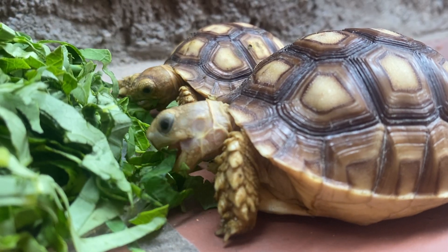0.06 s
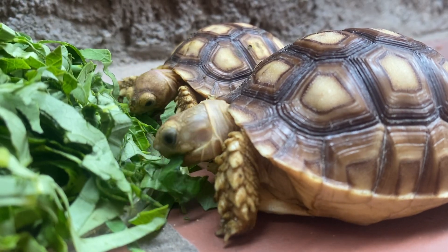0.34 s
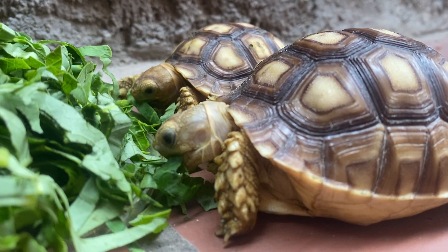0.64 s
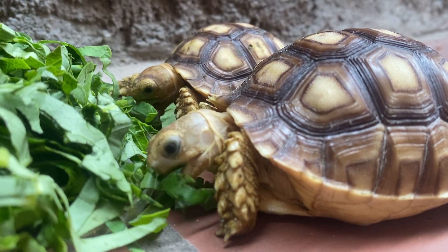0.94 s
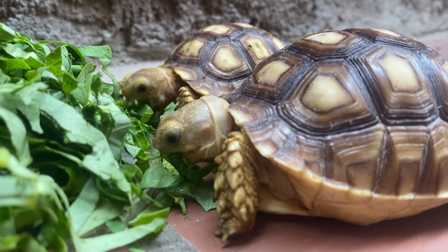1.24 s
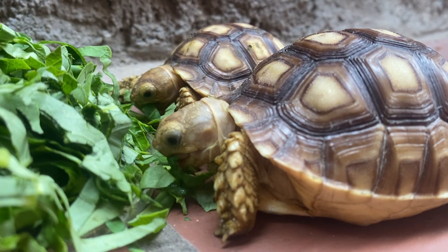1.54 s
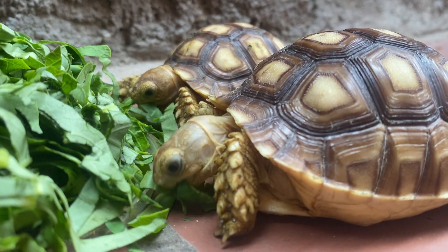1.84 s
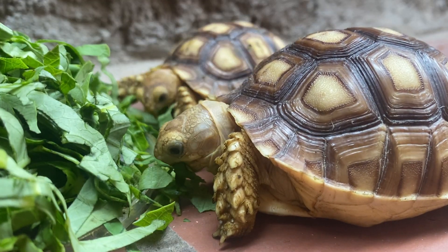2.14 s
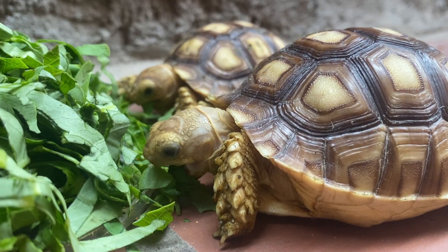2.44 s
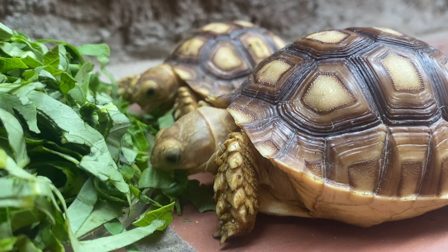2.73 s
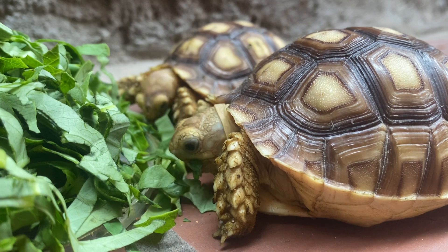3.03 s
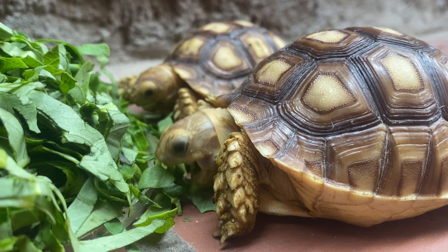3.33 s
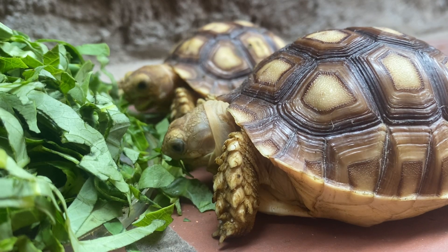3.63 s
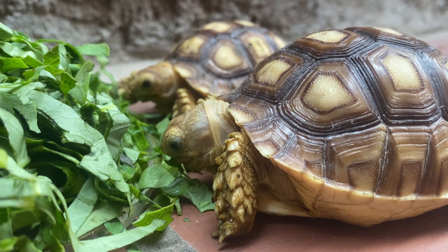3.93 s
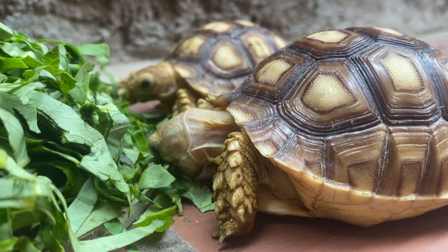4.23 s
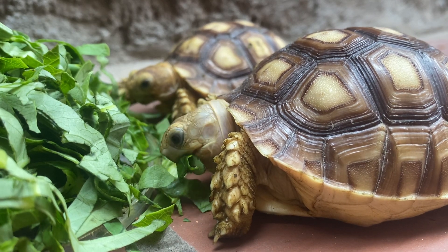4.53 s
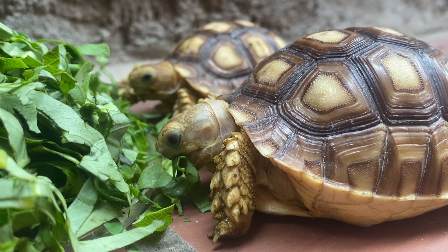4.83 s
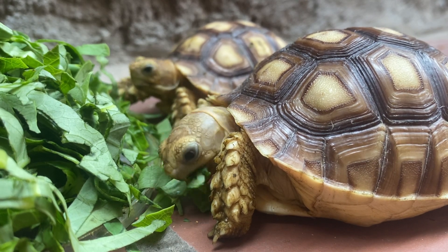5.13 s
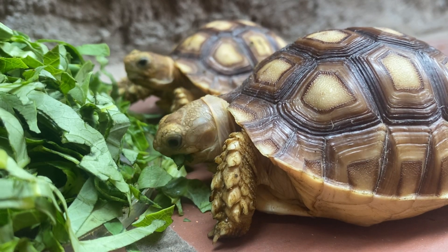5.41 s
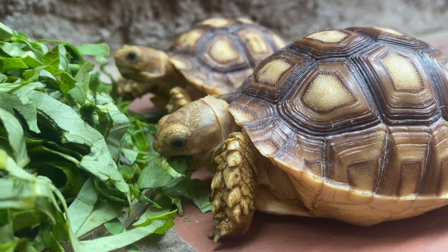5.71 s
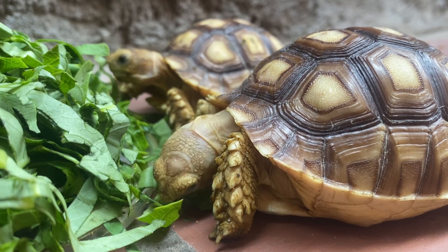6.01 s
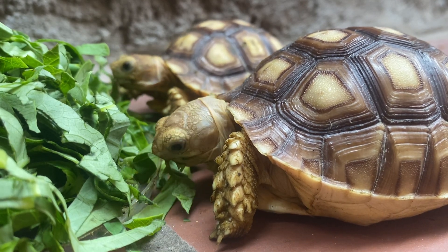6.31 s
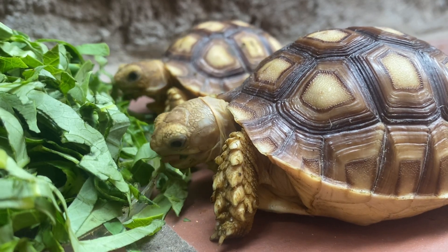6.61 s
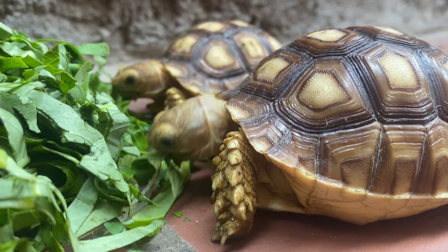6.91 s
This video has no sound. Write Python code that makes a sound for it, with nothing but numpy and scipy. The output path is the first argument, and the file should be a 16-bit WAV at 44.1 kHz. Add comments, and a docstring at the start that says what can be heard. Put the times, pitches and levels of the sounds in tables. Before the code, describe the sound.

Small tortoises bite leafy greens with faint crisp clicks over a steady low room rumble and a faint motor hum.

```python
"""A room, close to two small tortoises feeding on a heap of greens. Leaf ribs snap in their beaks
as runs of bursting cells, leaves rub in faint ticks, and three thin squeaks arch high in the treble.
Once, something knocks softly. Behind them the room rumbles and rushes, a motor's hum beats against
the mains, and a low drone swells."""
import sys
import numpy as np
from scipy import signal
from scipy.fft import rfft, irfft, next_fast_len
from scipy.io import wavfile
from scipy.ndimage import uniform_filter1d, map_coordinates

SR = 44100
rng = np.random.default_rng(int(sys.argv[2]) if len(sys.argv) > 2 else 0)


def store_wav(level_fs):
    """Save 16-bit WAV to argv[1]."""
    pcm = np.round(np.clip(np.atleast_2d(level_fs), -1, 1) * 32767)
    wavfile.write(sys.argv[1], SR, pcm.T.astype(np.int16))


N = 315754

# Room noise spectra. Each row: frequency in Hz, relative density in dB.
RUMBLE_SPECTRUM = [(20, -30), (28, -11), (38, -8.5), (50, -3), (70, -2), (95, -3), (120, -8.5), (170, -9),
                   (240, -16.5), (330, -21.5)]
AIR_SPECTRUM = [(280, 2), (370, -4), (500, -1.5), (680, -5), (1000, -3), (1250, -3.5), (1700, -9),
                (2500, -12.5), (3500, -20), (4600, -27.5), (6000, -28), (11500, -38.5), (15200, -49.5),
                (16200, -78)]
# Wall resonances. Each row: centre in Hz, half width in Hz, boost in dB.
WALL_MODES = [(473, 7.3, -3), (823, 31, 3), (1028, 28, 3), (1150, 34, 2.5), (1270, 30, 2), (1457, 28, 2.5),
              (1634, 40, 1.5), (2094, 79, 3.5), (2901, 77, 4.5), (4620, 370, 7.5)]
# Diffuse room field. Each row: frequency in Hz, left-right coherence from 0 to 1.
COHERENCE = [(60, 0.92), (220, 1), (340, 0.31), (420, 0.45), (510, .12), (620, 0.52), (720, 0.25),
             (900, 0.73), (1000, 0.17), (1130, 0.69), (1500, .45), (1650, 0.66), (1850, 0.12), (2060, 0.61),
             (2230, 0.16), (2400, .6), (2600, .2), (2900, 0.56), (3500, 0.12), (5700, 0.087), (6800, .56),
             (8500, 1)]
# Swells of motor harmonics 1, 2, 4, 5 and of the drone. Each row: time in seconds, relative level in dB.
HARMONIC_1_DB = [(0, -45), (.42, -45.5), (.9, -60), (1.56, -68), (2.04, -43), (2.46, -64), (2.82, -38),
                 (3.24, -45.5), (3.9, -39.5), (4.32, -48), (5.22, -41), (5.82, -46.5), (6.36, -40.5),
                 (7.15, -42)]
HARMONIC_2_DB = [(0, -48), (.22, -45), (.6, -43.5), (1.05, -41), (1.6, -42), (2.0, -44.5), (2.23, -55.5),
                 (2.38, -43.5), (2.58, -43.5), (2.72, -59), (2.88, -64), (3.0, -47.5), (3.5, -55),
                 (4.03, -48.5), (4.38, -59), (4.9, -45), (5.45, -41), (5.8, -51), (5.98, -39.5),
                 (6.2, -42.5), (6.45, -39), (6.9, -44), (7.15, -48.5)]
HARMONIC_4_DB = [(0, -55.5), (.3, -58.5), (.52, -49), (.95, -65), (1.08, -59), (1.25, -64.5), (1.43, -52),
                 (1.7, -59.5), (1.95, -53), (2.23, -70), (2.68, -56.5), (2.85, -61), (3.23, -53.5),
                 (3.45, -65.5), (3.7, -55.5), (3.85, -66), (4.22, -61), (4.38, -51), (4.6, -53),
                 (4.77, -60), (5.0, -50.5), (5.2, -55), (5.55, -71.5), (5.78, -50.5), (6.05, -61.5),
                 (6.38, -52), (6.58, -73), (6.82, -54.5), (7.0, -67)]
HARMONIC_5_DB = [(0, -57.5), (.9, -69), (1.03, -50), (1.2, -56.5), (1.9, -59), (2.3, -60), (3.2, -62),
                 (3.6, -60), (4.55, -63), (4.75, -50.5), (5.0, -64), (6.4, -78), (6.65, -52), (6.9, -74),
                 (7.15, -51)]
DRONE_DB = [(0.0, -32), (.24, -29), (.4, -42), (.56, -29.5), (.72, -28), (.8, -37), (.94, -30), (1.08, -36),
            (1.26, -28), (1.48, -46), (1.9, -44), (2.0, -31), (2.2, -50), (2.88, -34.5), (3.22, -54),
            (3.58, -32), (3.9, -42), (4.08, -30), (4.25, -42), (4.5, -41.5), (5.1, -38), (5.3, -58),
            (5.5, -40), (6.15, -41), (6.35, -39), (6.8, -36.5), (7.15, -47)]
# Weak motor overtones. Each row: harmonic number, level in dB.
MOTOR_OVERTONES = [(6, -64), (8, -67)]
# The knock's two blips. Each row: start in seconds, peak in dB, first and final pitch in Hz,
# glide and swell times in seconds.
KNOCK_BLIPS = [(1.3435, -32, 1400, 180, .0025, .0058), (1.372, -43.5, 750, 1350, .005, .0042)]
# Squeaks. Each row: centre and half length in seconds, arch top in Hz, level in dB, noise trim in dB.
SQUEAK_ARCHES = [(4.935, 0.045, 12900, -69, -8), (5.26, 0.082, 15300, -65.5, -2.5),
                 (5.636, 0.048, 12800, -71, -1)]
# Whistles in a squeak. Each row: ratio to the arch frequency, relative level in dB.
WHISTLES = [(0.94, 0), (0.95, -1), (.83, -8), (.74, -4)]
# Fraying of a whistle. Each row: pitch in Hz, jitter in Hz.
JITTER_HZ = [(12600, 130), (14000, 550)]
# Spectrum of a breaking leaf. Each row: frequency in Hz, gain in dB.
LEAF_SPECTRUM = [(1500, -40), (3000, 0), (4550, 8.5), (6400, 3.5), (7900, 4.5), (9500, -0.5), (11400, 4),
                 (13000, 0), (15000, -5), (16400, -25)]
# Leaf rubs. Each row: centre and half length in seconds, level in dB, tilt in dB per octave.
LEAF_RUBS = [(0.497, 0.025, -60.5, 5), (0.858, 0.0076, -63, -22), (1.055, .012, -69, 4),
             (1.292, 0.015, -64, -2), (2.88, 0.03, -65.5, 3), (4.479, .035, -74, 10),
             (6.33, 0.075, -56.8, -7), (6.78, 0.025, -68, 0), (6.912, 0.025, -64, 1),
             (6.982, 0.038, -67, 0)]
# Leaf snaps. Each row: start in seconds, relative strength in dB, tilt in dB per octave,
# crumbling in dB relative to the snap.
LEAF_SNAPS = [(.456, -61, 2, -10), (.4703, -58, 0, -6), (0.581, -50.5, -3, -6), (.5875, -56, 0, -8),
              (1.061, -52, 1, -10), (1.2785, -53, -2, -6), (1.301, -60, 6, -8), (1.307, -56, 3, -10),
              (1.9415, -56, -10, -8), (2.293, -55, 6, -9), (2.591, -55, -2, -7), (3.591, -46.5, 12, -10),
              (4.449, -64, 10, -10), (4.6708, -60, -10, -4), (6.6325, -47, 1, -12), (6.7172, -57, 1, -10),
              (6.73, -53, 6, -12), (6.737, -47.5, 9, -14), (6.7612, -56, -4, -8), (6.8143, -52, -1, -3),
              (6.8762, -50, 2, -6), (6.884, -52, 1, -7), (6.925, -58, 3, -4), (6.939, -54, 2, -9),
              (6.9545, -52, 3, -6), (6.96, -58, 4, -7), (6.977, -60, 4, -5), (6.9835, -61, 1, -5),
              (7.006, -54, 2, -6), (7.0097, -42.5, 19, -18), (7.0115, -40, 2.5, -16)]
# Lag of the left microphone port behind the right. Each row: frequency in Hz, lag in seconds.
PORT_LAG_S = [(430, .00042), (515, .00025), (690, .00058), (790, .00018), (900, .00042), (1030, .00023),
              (1330, .000365), (1700, .00026), (1900, .00035), (2400, .00044), (2600, .00031),
              (2850, .00036), (3100, .0003), (6900, .000146), (9000, .000166), (10500, .000183),
              (15400, .000192)]


def amp(db):
    """Decibels to gain."""
    return 10 ** (np.asarray(db) / 20)


def unit(x):
    """x at rms 1."""
    return x / np.sqrt(np.mean(x ** 2) + 1e-20)


def along(points, hz):
    """(Hz, value) points joined on a log axis."""
    knots_hz, values = np.transpose(points)
    return np.interp(np.log(hz + 1), np.log(knots_hz + 1), values)


def curve(points):
    """(seconds, value) points joined, one value per sample."""
    return np.interp(np.arange(N) / SR, *np.transpose(points))


def wobble(rate_hz):
    """Smooth random curve, rate_hz knots a second."""
    knots = rng.standard_normal(int(N * rate_hz / SR) + 4)
    return map_coordinates(knots, [np.arange(N) * rate_hz / SR])


def filtered(x, response):
    """x through a frequency response."""
    n = x.shape[-1]
    size = next_fast_len(2 * n)
    return irfft(rfft(x, size) * response(np.fft.rfftfreq(size, 1 / SR)), size)[..., :n]


def diffuse_noise(gain):
    """Partly coherent stereo noise of rms 1, shaped by gain(hz)."""
    def mid_side(hz):
        angle = np.arccos(np.clip(along(COHERENCE, hz), 0, 1)) / 2
        return gain(hz) * np.array([np.cos(angle), np.sin(angle)])
    mid, side = filtered(rng.standard_normal((2, N)), mid_side)
    return unit(np.array([mid + side, mid - side]))


def patchy(x, depth_db):
    """x at rms 1 with random gain patches of about 260 Hz by 0.1 s."""
    spectra = signal.stft(x, nperseg=512)[2]
    patches = uniform_filter1d(rng.standard_normal(spectra.shape[1:]), size=3, axis=0)
    patches = unit(uniform_filter1d(patches, size=16, axis=1))
    return unit(signal.istft(spectra * amp(depth_db * patches), nperseg=512)[1][:, :N])


def room(split_hz=290, floor_hz=33, ripple_db=1.52, rumble_fade_db_per_s=0.26, air_fade_db_per_s=0.1173):
    """Low rumble and a rush of air coloured by wall resonances; both ease slowly."""
    t = np.arange(N) / SR
    lowpass = lambda hz: 1 / np.sqrt(1 + (hz / split_hz) ** 10)
    highpass = lambda hz: np.sqrt(1 - lowpass(hz) ** 2)
    low_cut = lambda hz: 1 - 1 / (1 + (hz / floor_hz) ** 10)
    walls_db = lambda hz: sum(db / (1 + ((hz - centre) / width) ** 2) for centre, width, db in WALL_MODES)
    grid_hz = np.arange(0, SR / 2, 20)
    reflections_db = ripple_db * rng.standard_normal(len(grid_hz))
    colour_db = lambda hz: along(AIR_SPECTRUM, hz) + walls_db(hz) + np.interp(hz, grid_hz, reflections_db)
    rumble = diffuse_noise(lambda hz: amp(along(RUMBLE_SPECTRUM, hz)) * lowpass(hz) * low_cut(hz))
    air = diffuse_noise(lambda hz: amp(colour_db(hz)) * highpass(hz))
    rumble_db = -37.5 - rumble_fade_db_per_s * t + 0.7 * wobble(4.6)
    air_db = -44.5 - air_fade_db_per_s * t + 0.38 * wobble(7)
    return amp(rumble_db) * rumble + amp(air_db) * patchy(air, depth_db=1.32)


def motor(pitch_hz=103.52, drift=0.002826, third_db=-59, waver_db=3, flutter_db=0.9):
    """Unsteady motor harmonics swell separately; the third reaches the two ports in opposite phase."""
    phase = 2 * np.pi * np.cumsum(pitch_hz * (1 + drift * wobble(4))) / SR
    swell = lambda points, trim_db: amp(curve(points) + trim_db + flutter_db * wobble(6))
    hum = swell(HARMONIC_1_DB, 0) * np.sin(phase + 0.29 * wobble(9))
    hum += swell(HARMONIC_2_DB, -0.92) * np.sin(2 * phase)
    hum += swell(HARMONIC_4_DB, 0.9) * np.sin(4 * phase)
    hum += swell(HARMONIC_5_DB, -1) * np.sin(5 * phase)
    for harmonic, db in MOTOR_OVERTONES:
        hum += amp(db + waver_db * wobble(3.92)) * np.sin(harmonic * phase + 0.32 * wobble(6))
    third = amp(third_db + waver_db * wobble(4.4)) * np.sin(3 * phase)
    return np.sqrt(2) * np.array([hum + third, hum - third])


def mains(pitch_hz=99.0, rms_db=-47):
    """Steady mains hum just under the motor's pitch; the two beat at about 4.5 Hz."""
    return np.sqrt(2) * amp(rms_db) * np.sin(2 * np.pi * pitch_hz * np.arange(N) / SR)


def drone(pitch_hz=55, wander_hz=2, trim_db=-1.0, flutter_db=1.7):
    """A low tone wanders, swells and flutters."""
    phase = 2 * np.pi * np.cumsum(pitch_hz + wander_hz * wobble(7)) / SR
    return amp(curve(DRONE_DB) + trim_db + flutter_db * wobble(8.6)) * np.sin(phase)


def knock():
    """A soft knock: a low falling blip, then a small rising one."""
    out = np.zeros(N)
    for start_s, db, first_hz, final_hz, glide_s, swell_s in KNOCK_BLIPS:
        t = np.maximum(np.arange(N) / SR - start_s, 0)
        hz = final_hz + (first_hz - final_hz) * np.exp(-t / glide_s)
        envelope = (t / swell_s * np.exp(1 - t / swell_s)) ** 2
        out += amp(db) * envelope * np.sin(2 * np.pi * np.cumsum(hz) / SR)
    return out


def noise_band(centre_hz, width_hz):
    """Gaussian band of noise, rms 1."""
    bell = lambda hz: np.exp(-((hz - centre_hz) / width_hz) ** 2 / 2)
    return unit(filtered(rng.standard_normal(N), bell))


def whistle(hz, jitter, low_hz=10300, high_hz=11500):
    """A thin tone that frays as it climbs and fades outside low_hz to high_hz."""
    phase = 2 * np.pi * np.cumsum(hz + along(JITTER_HZ, hz) * jitter) / SR
    return np.sin(phase) / np.sqrt(1 + (hz / high_hz) ** 10) / (1 + (low_hz / hz) ** 20)


def squeaks(bend_hz_per_s2=340000, sputter_db=7, sputter_hz=60):
    """Sputtering whistles arch together over a hiss and a lower rasp."""
    t, out = np.arange(N) / SR, np.zeros(N)
    hiss = amp(-5) * noise_band(centre_hz=11400, width_hz=800)
    rasp = amp(3.5) * noise_band(centre_hz=4200, width_hz=330)
    sputter = lambda: unit(amp(sputter_db * np.tanh(wobble(sputter_hz))))
    parts = [(ratio, wobble(1500), amp(db) * sputter()) for ratio, db in WHISTLES]
    for centre_s, half_s, top_hz, db, noise_db in SQUEAK_ARCHES:
        arch_hz = np.maximum(top_hz - bend_hz_per_s2 * (t - centre_s) ** 2, 0.6 * top_hz)
        tones = sum(gain * whistle(ratio * arch_hz, jitter) for ratio, jitter, gain in parts)
        envelope = np.exp(-((t - centre_s) / half_s) ** 2 / 2)
        out += amp(db) * envelope * (tones + amp(noise_db) * (hiss + rasp))
    return out


def leafy(x, tilt_db_per_oct):
    """x at rms 1 in a leaf's colour, tilted brighter or duller."""
    octaves = lambda hz: np.log2(np.maximum(hz, 2000) / 8000)
    gain = lambda hz: amp(along(LEAF_SPECTRUM, hz) + tilt_db_per_oct * octaves(hz)) * (hz > 1000)
    return unit(filtered(x, gain))


def ticks(n, per_s):
    """n samples of sparse random impulses."""
    return (rng.random(n) < per_s / SR) * rng.standard_normal(n)


def rubs(ticks_per_s=2500):
    """Dragged leaves catch on each other in swells of tiny ticks."""
    t, out = np.arange(N) / SR, np.zeros(N)
    for centre_s, half_s, db, tilt_db_per_oct in LEAF_RUBS:
        envelope = np.exp(-((t - centre_s) / half_s) ** 2 / 2)
        out += amp(db) * envelope * leafy(ticks(N, ticks_per_s), tilt_db_per_oct)
    return out


def bites(strain_t60_s=0.06, crumble_t60_s=0.13, crumbs_per_s=1100, hard_snap_db=-39.5, gain_db=17.5):
    """A snap is a run of bursting cells, longer when harder; stray cells give way before and after."""
    out = np.zeros(N + SR)
    lead = SR // 8
    t = np.arange(-lead, lead) / SR
    crumb_envelope = amp(-60 * np.maximum(t / crumble_t60_s, -t / strain_t60_s))
    for start_s, db, tilt_db_per_oct, crumble_db in LEAF_SNAPS:
        tear_s = 0.00054 + 0.0012 * amp(db - hard_snap_db) ** 2
        cells = ((t >= 0) & (t < tear_s)) * rng.choice([-1., 1.], len(t))
        crumbs = ticks(len(t), crumbs_per_s) * crumb_envelope
        snap = leafy(cells, tilt_db_per_oct) + amp(crumble_db) * leafy(crumbs, tilt_db_per_oct)
        first = round(start_s * SR) - lead
        out[first:first + len(t)] += amp(db + gain_db) * snap / np.sqrt(len(t))
    return out[:N]


def from_right(x):
    """Sound from the right reaches the left port slightly late."""
    return filtered(x, lambda hz: np.exp(np.array([[-1j], [1j]]) * np.pi * hz * along(PORT_LAG_S, hz)))


def scene(lean_db=0.5):
    """Knock dead ahead; the rest arrives from the right, only the background louder on that side."""
    feeding = bites() + rubs() + squeaks()
    background = room() + motor() + mains() + drone()
    lean = amp([[-lean_db], [lean_db]])
    return knock() + from_right(feeding + lean * background)


def record(dry, top_hz=16500):
    """The phone keeps nothing above its band limit."""
    return filtered(dry, lambda hz: hz < top_hz)


dry = scene()
out = record(dry)
store_wav(out)
```